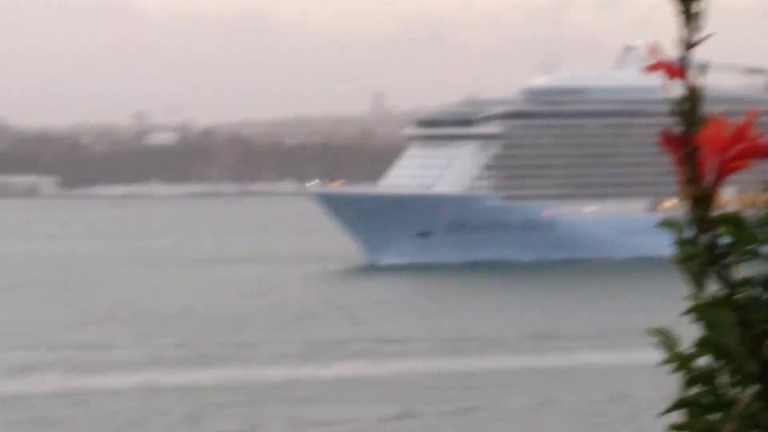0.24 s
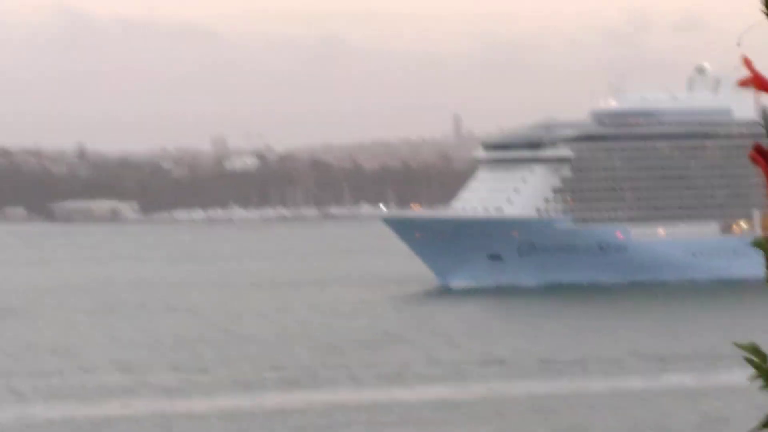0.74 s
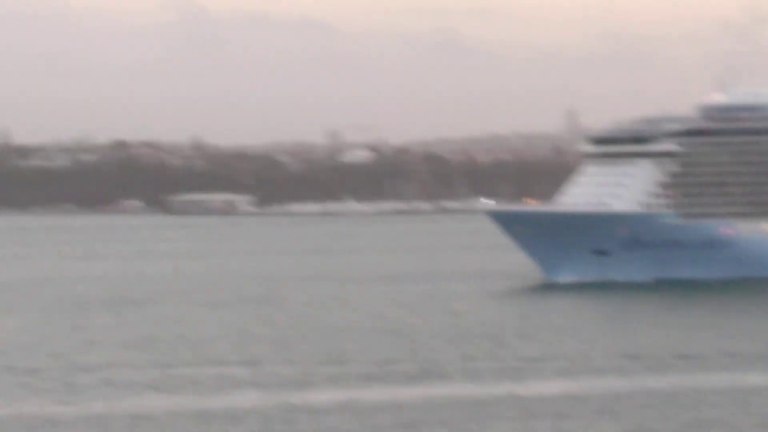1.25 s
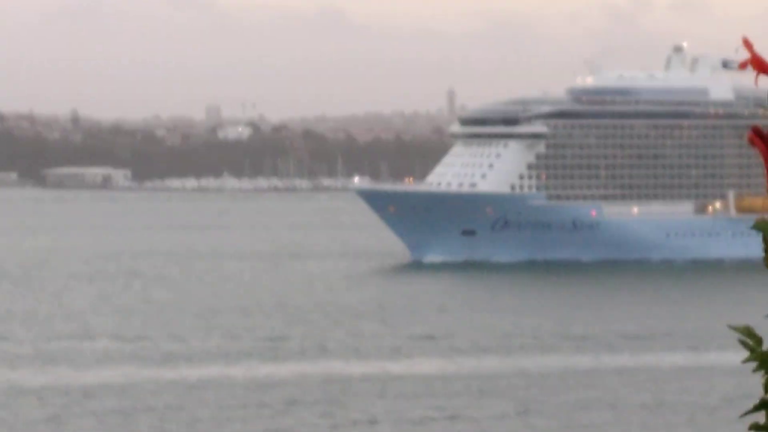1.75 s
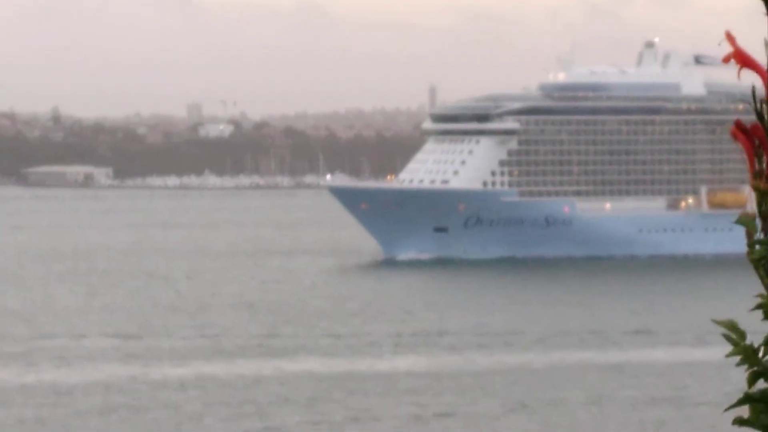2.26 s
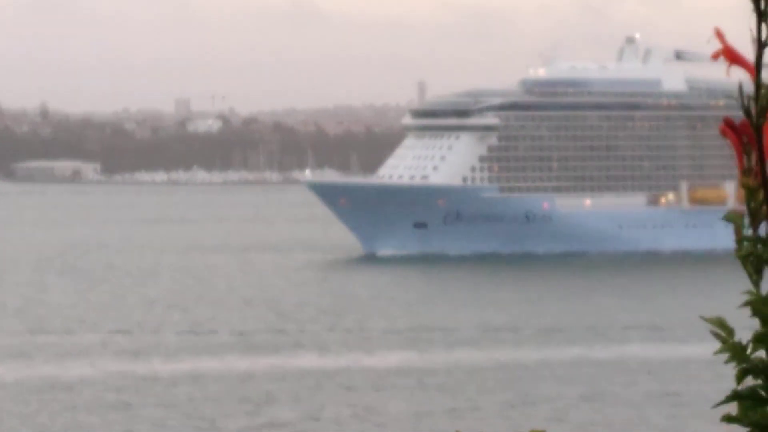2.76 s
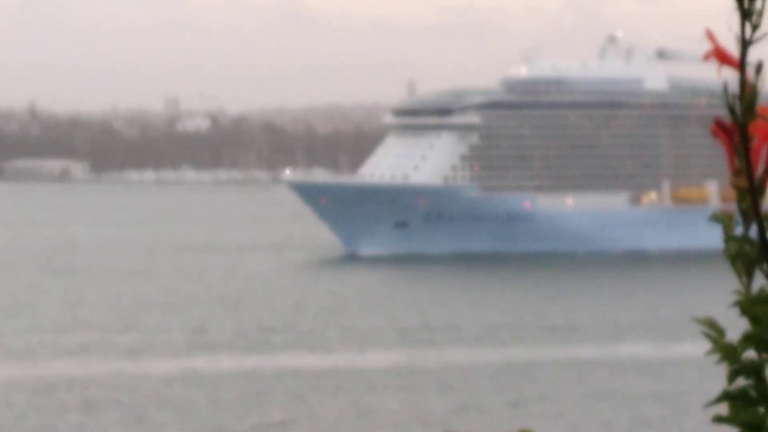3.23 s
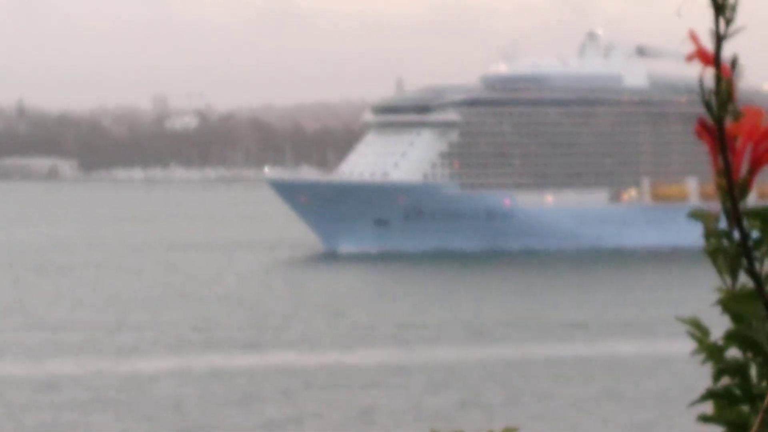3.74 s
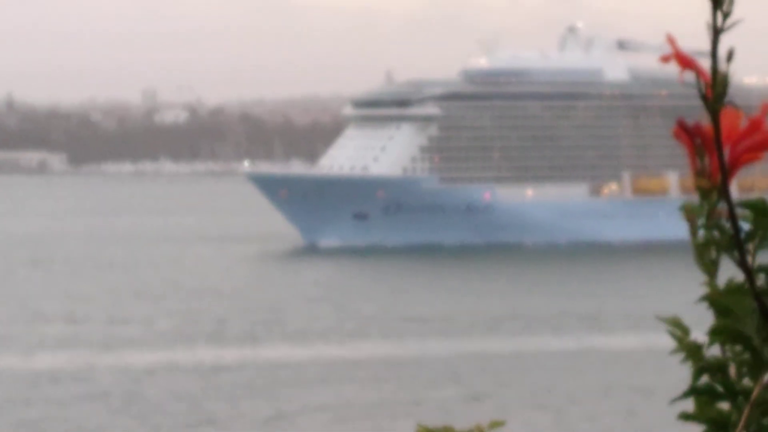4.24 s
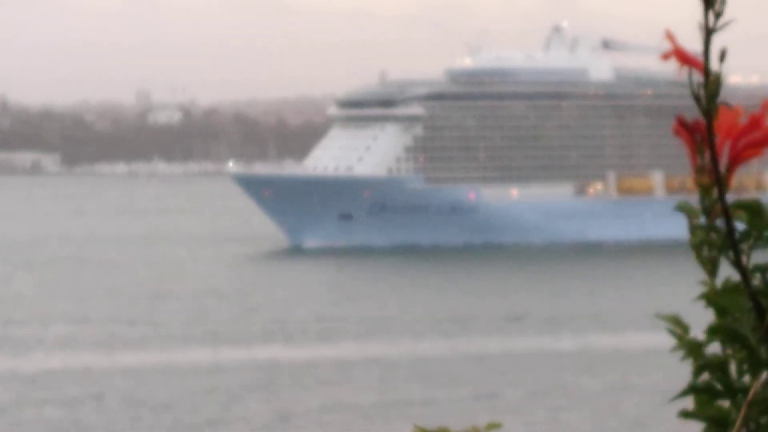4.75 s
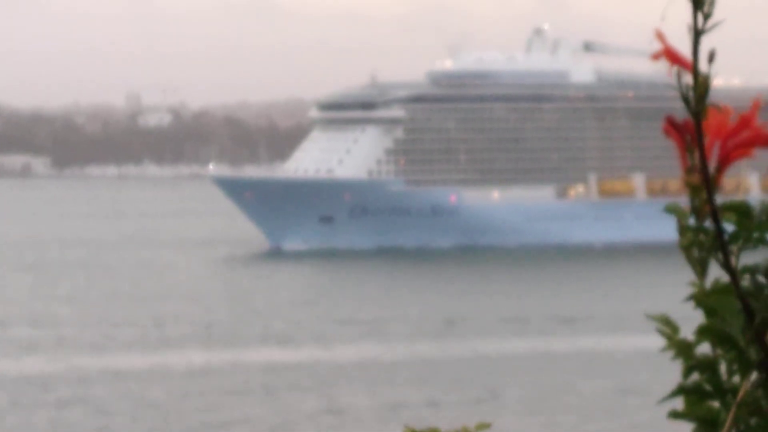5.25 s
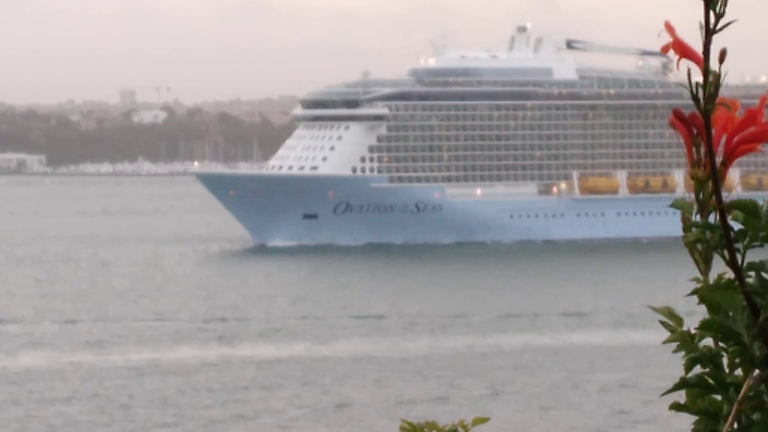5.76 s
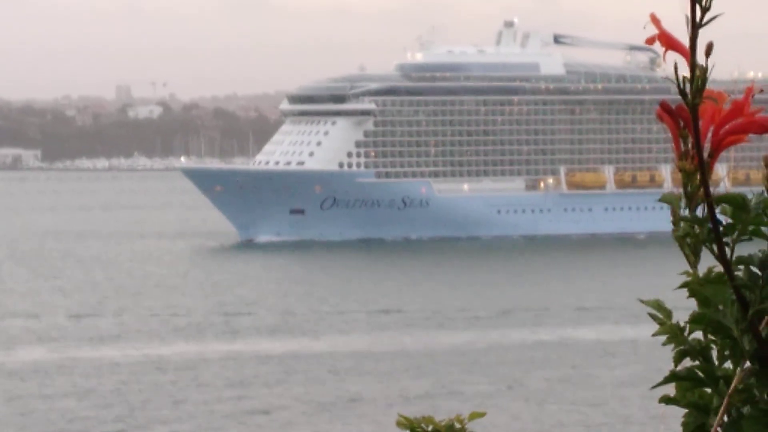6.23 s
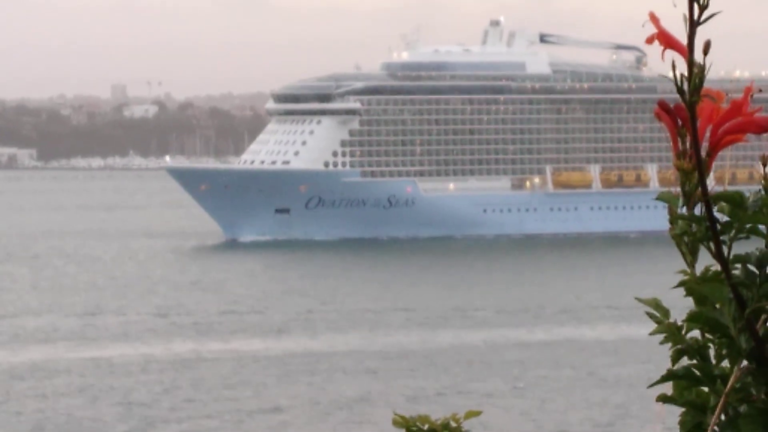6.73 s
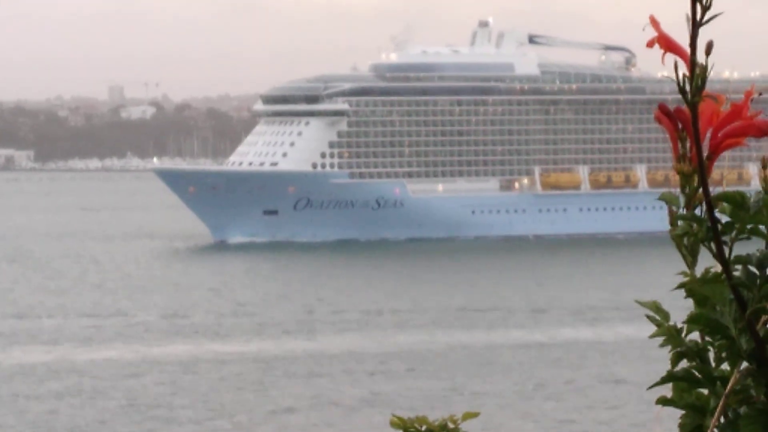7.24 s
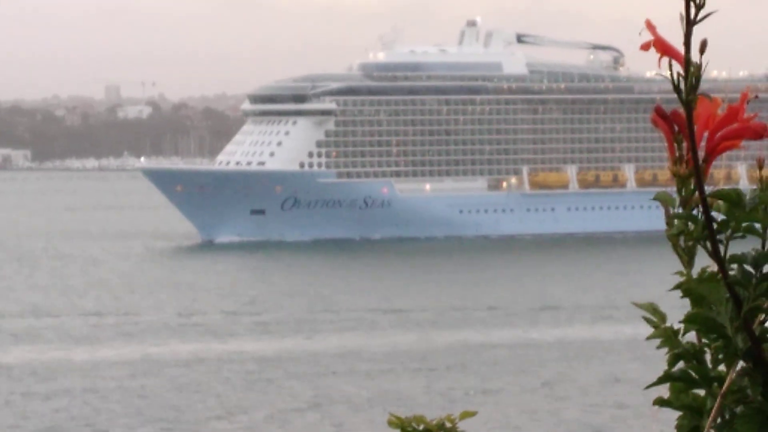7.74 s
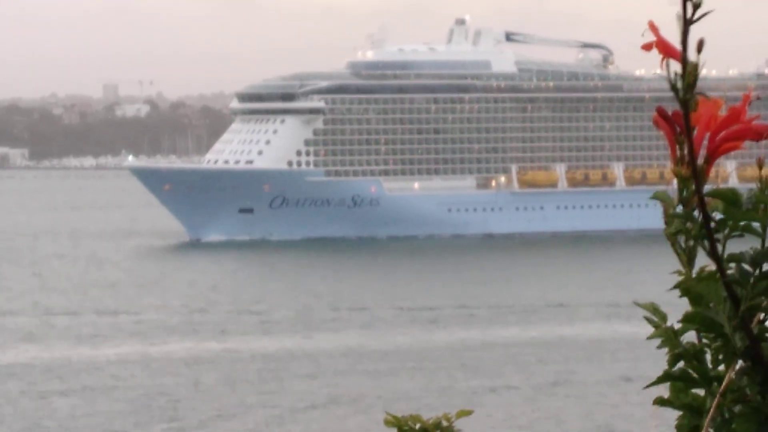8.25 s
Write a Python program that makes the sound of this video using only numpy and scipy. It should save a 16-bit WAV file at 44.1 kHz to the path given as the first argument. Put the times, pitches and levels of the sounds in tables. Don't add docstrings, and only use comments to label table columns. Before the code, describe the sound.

A large ship's deep, pulsing engine drone runs throughout over a dull wash of harbour water and distant city. Wind thuds and rumbles on the microphone, strongest on the right early on. Small twig ticks, a short faint hoarse bird call, soft wavelet slaps and far traffic moans pass by. Thin high chirps gather later, before a ringing tick close to the end. Handheld outdoor stereo sound, treble muffled by noise reduction.

```python
import sys
import numpy as np
from scipy import signal
from scipy.io import wavfile
from scipy.ndimage import uniform_filter1d

SR = 44100
rng = np.random.default_rng(int(sys.argv[2]) if len(sys.argv) > 2 else 0)


def log_audio(samples):
    frames = np.atleast_2d(samples).T
    limited = np.clip(frames, -1, 1)
    pcm = np.round(limited * 32767).astype(np.int16)
    wavfile.write(sys.argv[1], SR, pcm)


def field_ratio(decibels):
    return 10 ** (np.asarray(decibels, dtype=float) / 20)


N = 374409
LEFT_LAG_SAMPLES = 3

# (time [s], level [dB])
ROAR_SWELL = [(0.0, -1.5), (.14, -3), (.5, -3), (1.4, -4.5), (2.1, -2.5), (2.35, 1.5), (2.6, -1.5),
              (3.6, -2), (3.9, 0.5), (4.2, -3.5), (5.2, -2.5), (5.85, -1), (6.25, 2.5), (6.7, -0.5),
              (7.45, -3), (7.75, -1.5), (8.2, -0.5), (8.49, -2)]
# (frequency [Hz], density [dB per Hz])
ROAR_SPECTRUM = [(40, -59.5), (120, -69), (200, -68.5), (270, -74), (370, -71.5), (530, -77), (730, -78),
                 (1100, -83.5), (1600, -92), (2400, -96), (3500, -102), (5200, -111), (8500, -118),
                 (12500, -120)]
# (frequency [Hz], likeness [0..1])
ROAR_LIKENESS = [(60, 0.96), (300, 0.97), (530, 0.85), (1000, 0.43), (1500, 0.2), (2230, 0.77),
                 (4600, 0.044)]
# (time [s], length [s], centre [Hz], lift [dB])
SHORE_WASHES = [(.12, .08, 357, 6), (0.141, 0.21, 946, 4.5), (.23, 0.085, 605, 1.5), (.92, .2, 836, 4),
                (1.53, 0.11, 1900, 5.5), (1.938, .2, 705, 2.5), (2.303, 0.076, 914, 5.5),
                (2.37, 0.066, 400, 2.5), (2.507, 0.031, 855, 6), (2.742, 0.3, 306, 8),
                (2.706, .3, 217, 6.5), (2.8, 0.31, 447, 2.5), (6.398, 0.098, 905, 4), (6.25, 0.4, 1725, 2),
                (6.2, .35, 2200, 1.5), (0.203, 0.044, 805, 4), (5.5, .05, 435, 5), (8.15, 0.22, 432, 1),
                (0.899, 0.33, 2300, 3), (2.681, 0.069, 707, 7.5), (2.945, .07, 727, 2.5),
                (3.19, 0.13, 707, 4.5), (3.87, .1, 620, 8), (4.306, 0.12, 675, 5), (4.685, 0.17, 938, 6),
                (4.7, 0.19, 344, 5), (5.3, .08, 707, 5), (5.613, 0.13, 627, 5.5), (5.895, 0.11, 1030, 4),
                (6.104, .1, 670, 7), (6.37, 0.054, 910, 3.5), (6.59, 0.097, 471, 5), (6.79, 0.2, 360, 5.5),
                (6.856, 0.053, 587, 1), (7.052, 0.084, 750, -1.5), (7.696, .05, 456, -1),
                (8.165, 0.16, 830, 6), (8.421, 0.065, 353, 3)]
# (time [s], length [s], from [Hz], to [Hz], level [dB])
TRAFFIC_MOANS = [
    (2.311, 0.12, 410, 388, -47),
    (2.415, 0.12, 350, 327, -51.5),
    (2.9, 0.096, 740, 702, -56.5),
    (3.086, 0.17, 720, 691, -53),
    (6.047, 0.13, 745, 728, -59),
    (6.33, 0.099, 850, 844, -52.5),
    (6.414, 0.3, 445, 438, -51.5),
    (6.685, 0.42, 370, 309.6, -50.5),
    (6.781, .11, 585, 566, -53.5),
    (6.951, 0.187, 735, 688, -55.5),
]
# (time [s], peak [dB], pitch [Hz])
WAVELET_SLAPS = [(0.34, -40, 738), (0.765, -43, 554), (1.178, -44, 560), (2.383, -37, 670),
                 (2.608, -42, 557), (2.713, -39, 657), (3.235, -40, 692), (3.853, -37, 686),
                 (3.914, -39, 528), (4.093, -43, 853), (4.185, -42, 783), (4.21, -41, 452),
                 (5.252, -42, 676), (5.333, -39, 689), (6.234, -37, 633), (7.174, -40, 600),
                 (7.891, -42, 659), (8.008, -43, 735), (8.081, -38, 684), (8.142, -37, 746),
                 (8.249, -38, 452), (8.411, -44, 651)]
# (time [s], level [dB])
WIND_LULL = [(0.0, -37), (1.0, -37), (2.0, -28.5), (3.0, -38.5), (4.3, -32.5), (5.2, -41), (6.3, -42.5),
             (7.2, -33.5), (8.49, -41)]
# (time [s], peak [dB], length [s])
GUSTS_LEFT = [(0.0, -25, .1), (0.327, -39, .15), (.66, -33, .1), (1.0, -31, 0.1), (1.26, -32, 0.38),
              (1.783, -39, .13), (2.307, -34, 0.11), (2.75, -25, 0.11), (3.08, -34, 0.12),
              (3.45, -29, 0.12), (3.632, -28.5, 0.18), (3.963, -23, 0.13), (4.25, -37, .2),
              (4.678, -27.5, 0.27), (4.95, -35, 0.18), (5.42, -40.5, 0.24), (6.05, -35, 0.12),
              (6.565, -23, 0.11), (6.899, -29, 0.19), (7.345, -39, 0.16), (7.621, -24, 0.12),
              (7.802, -34, 0.16), (8.136, -26, 0.24), (8.438, -30, 0.18)]
GUSTS_RIGHT = [(0.0, -25, 0.75), (0.334, -27, 0.13), (0.555, -36, 0.16), (1.038, -26, 0.089),
               (1.17, -22, 0.058), (1.302, -17.5, 0.14), (1.688, -22, 0.13), (1.801, -22, 0.17),
               (2.18, -22, 0.059), (2.484, -28, 0.22), (2.75, -27.5, 0.11), (3.19, -39, 0.075),
               (3.449, -16.5, 0.037), (3.558, -20, 0.14), (3.738, -21.5, 0.12), (3.993, -20, 0.067),
               (4.089, -25, 0.12), (4.319, -29, 0.4), (4.522, -25.5, .1), (4.696, -23, 0.17),
               (4.946, -27, 0.14), (6.317, -29.5, .16), (6.593, -40, 0.13), (6.9, -33, 0.081),
               (7.074, -29.5, 0.56), (7.361, -24.5, 0.064), (7.588, -37, 0.1), (7.921, -30, 0.12),
               (8.238, -26, 0.16)]
# (time [s], peak [dB], width [s])
BUFFETS_LEFT = [(2.526, -22, 0.0068), (2.745, -17, 0.011), (3.662, -22.5, 0.0066), (3.891, -21, 0.0062),
                (3.925, -26.5, 0.005), (4.073, -18, 0.0049), (4.266, -21, 0.0073), (4.719, -29, 0.0093),
                (6.554, -30, 0.011), (6.883, -16.5, 0.012), (6.961, -23, 0.0074), (7.355, -16, 0.011),
                (7.733, -18, 0.009), (8.414, -21, 0.0079), (8.447, -17.5, 0.01)]
BUFFETS_RIGHT = [(0.044, -14, 0.008), (1.162, -13, 0.0088), (1.254, -28, 0.0037), (1.299, -13.5, 0.0053),
                 (1.342, -14.5, 0.0061), (1.413, -19, 0.012), (1.497, -20, 0.01), (1.69, -15, 0.0084),
                 (1.766, -29, 0.0029), (1.797, -12.5, 0.0077), (1.933, -23, 0.00487351),
                 (1.968, -17, 0.0081), (2.024, -24.5, 0.0069), (2.18, -14.5, 0.0066),
                 (2.286, -20.5, 0.0085), (3.457, -20, 0.005), (3.511, -23, 0.0064), (3.571, -12.5, 0.008),
                 (3.607, -26.5, 0.0087), (3.765, -19, 0.0067), (4.001, -15, 0.0075), (4.185, -21, 0.0067),
                 (4.322, -19, 0.0034), (4.521, -24, 0.0027), (4.553, -24, 0.00454715), (4.597, -20, 0.019),
                 (4.642, -25.5, 0.0066), (7.142, -29.5, 0.0053), (8.273, -18.5, 0.0093)]
# (time [s], length [s], from [Hz], to [Hz], level [dB])
BIRD_NOTES = [(5.275, 0.063, 7230, 7700, -79.5), (5.809, 0.028, 7100, 7500, -77),
              (5.85, 0.033, 7700, 7300, -78), (5.97, .03, 7700, 8000, -79), (6.003, .04, 7940, 7750, -77),
              (6.018, 0.018, 7360, 7420, -69), (6.034, 0.025, 7350, 7100, -77),
              (6.057, .035, 7250, 7300, -75), (6.086, 0.046, 7400, 7600, -70),
              (6.13, 0.036, 7400, 7700, -78), (6.29, .06, 7000, 7200, -81),
              (6.336, 0.067, 7280, 7420, -68.5), (6.828, 0.05, 6640, 7300, -84),
              (6.865, 0.042, 7270, 7330, -71), (6.884, 0.058, 7360, 7730, -74),
              (7.1, 0.05, 7100, 7300, -72), (7.126, 0.058, 7570, 7500, -64.5),
              (7.3, 0.085, 6620, 6770, -87.5), (6.898, 0.04, 3720, 3550, -78),
              (6.959, 0.037, 3390, 3590, -70),
              (0.858, 0.044, 9050, 9050, -86), (.99, 0.018, 8500, 8460, -88), (1.96, .02, 8700, 8500, -79),
             (2.047, .025, 8000, 7600, -72), (2.91, .08, 8650, 8750, -81.5), (7.48, .05, 5900, 5750, -81),
             (7.56, 0.044, 6070, 5950, -93), (.9, .09, 8460, 8450, -86), (4.175, .035, 8150, 7900, -84),
             (3.935, .018, 8800, 8550, -75), (3.95, .045, 8600, 8600, -85), (3.99, .035, 8750, 8850, -79),
             (4.025, .045, 8720, 8600, -82.5), (4.07, .045, 8600, 8750, -84), (4.11, .035, 8750, 8580, -83),
             (4.24, .03, 8550, 8600, -86), (4.33, .035, 8750, 8620, -84), (5.538, .04, 7200, 7600, -79)]
# (time [s], pitch [Hz], level [dB], left minus right [dB])
HOARSE_CALL = [
    (1.365, 4250, -83, -1),
    (1.39, 4400, -75.5, 6),
    (1.45, 4550, -71.5, 9),
    (1.52, 4400, -76, 8),
    (1.56, 4670, -72, 8),
    (1.6, 4850, -78, 15),
    (1.628, 4940, -77, 6),
    (1.634, 5100, -101, -4),
]
# (time [s], peak [dB], left minus right [dB], brightness [Hz], ring share [dB])
TWIG_TICKS = [
    (.597, -53, 0, 6380, -70),
    (1.6144, -61, 11, 6800, -70),
    (1.7383, -42.5, 19.5, 1700, -70.5),
    (1.7385, -52.5, 11, 4800, -70),
    (1.759, -55, 5.5, 2500, -66.5),
    (2.7408, -46.5, -2, 8500, -70),
    (8.0349, -32.5, 6.5, 6600, 8),
]
# (frequency [Hz], level [dB], t60 [s], left minus right [dB])
RING_MODES = [(2920, -28, .06, 0.0), (3550, -3.5, 0.019, -16.5), (4230, 3.5, 0.015, 2),
              (4850, -6, .008, 0.0), (4445, -20, 0.04, 2), (5320, -19, 0.03, -14), (6310, -4, 0.032, 10),
              (6185, -11, .025, 10), (6545, -20, 0.065, 9), (6930, -17.5, .051, 10), (7960, -30, .06, -3),
              (8962, -20.5, 0.04, -23), (9500, -6, .01, -14), (9905, -28, 0.07, -17)]
# (time [s], firing tone [dB], air path clearness [dB], shaft throb [dB])
SHIP_LEVELS = [(0.0, -32.5, -7, -38), (.5, -31.5, 1, -28.5), (1.0, -35.5, 7.5, -31.5), (1.5, -34, -2, -28),
               (2.0, -31.5, 9.5, -28.5), (2.5, -31.5, -5, -34.5), (3.0, -34.5, 10, -29),
               (3.5, -34.5, 9, -39), (4.0, -32.5, -5, -33), (4.5, -33, 6, -33.5), (5.2, -32, -15, -36),
               (6.0, -34, 9.5, -36), (6.5, -34, -5.5, -35), (7.0, -37.5, -15, -30), (7.5, -38.5, 0, -30.5),
               (8.0, -34.5, 7, -29.5), (8.49, -35, 9.5, -31.5)]
# (start [s], held [s], opening [dB])
FILTER_OPENINGS = [(1.355, .276, 6), (2.249, 0.11, -3.5), (2.414, 0.046, -7), (2.468, 0.043, -6),
                   (2.737, 0.025, -6), (3.038, .024, -5.5), (3.132, 0.024, -4.5), (3.411, 0.039, 8),
                   (3.868, 0.03, -5), (4.248, 0.026, -2), (5.059, 0.021, -10), (5.308, 0.036, -2),
                   (5.793, 0.027, -3), (5.845, 0.04, -5), (5.895, .622, 2), (6.569, 0.07, -5),
                   (6.826, .029, -4), (6.876, .066, 9), (6.953, .056, -2), (7.128, 0.054, -1),
                   (7.331, 0.081, 19), (7.558, 0.038, -1), (7.94, 0.045, -1), (8.025, 0.074, -1),
                   (8.098, 0.083, -2), (8.178, 0.06, -3)]
# (start [s], opening [dB])
FILTER_BLINKS = [(.075, -14), (0.126, -7), (.64, -10.5), (.993, -8.5), (1.055, -8.5), (1.119, -4),
                 (1.217, -5), (1.33, -6), (1.734, 14), (1.747, -7), (1.913, -6.5), (1.959, -9), (2.154, -5),
                 (2.182, -3), (2.22, -10), (2.55, -11.5), (2.711, -7), (3.764, -11.5), (3.797, -7),
                 (3.932, -12.5), (4.0, -18), (4.59, -11), (4.652, -6), (4.9, -8.5), (5.279, -5),
                 (5.739, -10), (6.553, -6.5), (7.108, -8), (7.251, -6), (7.308, -8), (7.629, -8.5),
                 (8.251, -6)]


def rms_one(x):
    return x / np.sqrt(np.mean(x ** 2, axis=-1, keepdims=True) + 1e-20)


def in_time(rows):
    time_s, *columns = np.transpose(rows)
    return [np.interp(np.arange(N) / SR, time_s, c) for c in columns]


def at_hz(points, hz):
    points_hz, values = np.transpose(points)
    return np.interp(np.log(hz), np.log(points_hz), values)


def drift(rate_hz):
    r = np.exp(-80 * np.pi * rate_hz / SR)
    slow = signal.lfilter([1], [1, -2 * r, r * r], rng.standard_normal(N // 40 + 2002))[2000:]
    return np.interp(np.arange(N) / 40, np.arange(len(slow)), rms_one(slow))


def cut(x, hz, kind, order=2):
    return signal.sosfilt(signal.butter(order, hz, kind, fs=SR, output="sos"), x)


def noise_band(low_hz, high_hz, order=2, shape=N):
    return rms_one(cut(rng.standard_normal(shape), [low_hz, high_hz], "band", order))


def panned(x, pan_db, lag=0.0):
    late = np.interp(np.arange(len(x)) - lag, np.arange(len(x)), x)
    return np.array([late * field_ratio(pan_db / 2), x * field_ratio(-pan_db / 2)])


def tone(hz, level_db):
    phase = 2 * np.pi * np.cumsum(hz) / SR + 2 * np.pi * rng.random()
    return np.sqrt(2) * field_ratio(level_db) * np.sin(phase)


def washes(hz):
    time_s, length_s, centre_hz, lift_db = np.transpose(SHORE_WASHES)[:, :, None]
    t = np.arange(0, N + 400, 200) / SR
    octaves = np.log2(hz / centre_hz)
    bells_db = lift_db * np.exp(-((t - time_s) / length_s) ** 2 - (octaves / 0.33) ** 2)
    return np.interp(np.arange(N) / SR, t, bells_db.sum(axis=0))


def roar(firing):
    swell_db, = in_time(ROAR_SWELL)
    edges_hz = 40 * 2 ** (np.arange(27) / 3)
    white = rng.standard_normal((2, 2, N))
    puff = np.cos(firing - 3.3)
    out = 0
    for k, (low_hz, high_hz) in enumerate(zip(edges_hz, edges_hz[1:])):
        hz = np.sqrt(low_hz * high_hz)
        mid, side = cut(white[k % 2], [low_hz, high_hz], "band") * np.sqrt(SR / 2)
        alike = np.clip(at_hz(ROAR_LIKENESS, hz), 0, 1)
        flicker_db = 0.5 * drift(0.36) + 1.7 * drift(4.4)
        gain = field_ratio(at_hz(ROAR_SPECTRUM, hz) + swell_db + washes(hz) + flicker_db)
        gain = gain * (1 + 0.33 * min(1, 1300 / hz) * puff)
        stereo = np.sqrt(1 + alike) * mid + np.sqrt(1 - alike) * side * [[1], [-1]]
        out = out + gain * stereo / np.sqrt(2)
    out[0, LEFT_LAG_SAMPLES:] = out[0, :-LEFT_LAG_SAMPLES].copy()
    return out * field_ratio(1.1 * drift(33.0))


def moans():
    width_hz = 22
    out, rough = np.zeros(N), (drift(width_hz), drift(width_hz))
    for time_s, length_s, from_hz, to_hz, db in TRAFFIC_MOANS:
        a, b = round(time_s * SR), round((time_s + length_s) * SR)
        phase = 2 * np.pi * np.cumsum(np.linspace(from_hz, to_hz, b - a)) / SR
        voice = (1 + rough[0][a:b]) * np.sin(phase) + rough[1][a:b] * np.cos(phase)
        out[a:b] += field_ratio(db) * signal.windows.tukey(b - a, 0.6) * voice
    return panned(out, 0.3, lag=LEFT_LAG_SAMPLES)


def slaps():
    t60_s, trim_db, rise_share = 0.03, -2.5, 0.1
    out, t = np.zeros(N + 4410), np.arange(4410) / SR
    for time_s, db, hz in WAVELET_SLAPS:
        ringing = np.sin(2 * np.pi * hz * t * (1 + rise_share * t / t60_s))
        plop = ringing * field_ratio(db + trim_db - 60 * t / t60_s)
        start = round(time_s * SR)
        out[start:start + len(t)] += plop * np.minimum(t / 0.0013, 1)
    return panned(out[:N], 0.5, lag=LEFT_LAG_SAMPLES)


def gusts(rows):
    time_s, peak_db, length_s = np.transpose(rows)[:, :, None]
    t = np.arange(0, N + 400, 200) / SR
    fall_db = 13 * np.abs(t - time_s) / length_s
    peaks_db = (peak_db - fall_db).max(axis=0)
    return np.maximum(np.interp(np.arange(N) / SR, t, peaks_db), in_time(WIND_LULL)[0])


def buffets(rows):
    narrowing, trim_db = 0.49, -2
    out, t = np.zeros(N + 4000), np.arange(-2000, 2000) / SR
    for (time_s, db, width_s), sign in zip(rows, rng.choice([-1, 1], len(rows))):
        u = t / (width_s * narrowing)
        start = round(time_s * SR)
        out[start:start + len(t)] += sign * field_ratio(db + trim_db) * u * np.exp(0.5 - u ** 2 / 2)
    return out[2000:N + 2000]


def evened_noise(low_hz, high_hz, order):
    x = cut(cut(rng.standard_normal(N), high_hz, "low", order), low_hz, "high")
    return rms_one(x / np.sqrt(uniform_filter1d(x ** 2, size=3500) + 0.22 * np.mean(x ** 2)))


def wind():
    out = []
    for gust_rows, buffet_rows in (GUSTS_LEFT, BUFFETS_LEFT), (GUSTS_RIGHT, BUFFETS_RIGHT):
        lumps_db = gusts(gust_rows) + 2.0 * drift(6.2)
        thud_db = np.minimum(-45.5 + 1.8 * (lumps_db + 24.5), -24)
        rumble = field_ratio(lumps_db - 3.5) * evened_noise(19, 50, order=3)
        sway = field_ratio(lumps_db - 2.5) * evened_noise(4, 19, order=3)
        thud = field_ratio(thud_db) * evened_noise(50, 130, order=2)
        out.append(rumble + sway + thud + buffets(buffet_rows))
    return np.array(out)


def birds():
    glide_share, swell_db = 0.72, 4
    out = np.zeros((2, N))
    unsteady, flutter_db = 1 + 0.0026 * drift(60), 1.8 * drift(50)
    for time_s, length_s, from_hz, to_hz, db in BIRD_NOTES:
        a, b = round(time_s * SR), round((time_s + length_s) * SR)
        done = np.minimum(np.linspace(0, 1, b - a) / glide_share, 1)
        hz = from_hz + (to_hz - from_hz) * np.sin(np.pi / 2 * done) ** 2
        below_top = 1 - done if to_hz > from_hz else done
        note = tone(hz * unsteady[a:b], db - swell_db * below_top + flutter_db[a:b])
        out[:, a:b] += panned(signal.windows.tukey(b - a, 0.35) * note, 5.3, lag=-0.58)
    return out


def hoarse_call():
    hz, db, pan_db = in_time(HOARSE_CALL)
    phase = 2 * np.pi * np.cumsum(hz) / SR
    rough = rms_one(cut(rng.standard_normal((4, N)), 220, "low"))
    airy = noise_band(1300, 6000)
    voice = rough[0] * np.sin(phase) + rough[1] * np.cos(phase)
    octave = rough[2] * np.sin(2 * phase) + rough[3] * np.cos(2 * phase)
    on = np.where(db > -91, 1, 0)
    return panned(field_ratio(db) * on * (voice + field_ratio(-18.0) * octave + field_ratio(-5.0) * airy), pan_db)


def ticks():
    out, t = np.zeros((2, N + 8820)), np.arange(8820) / SR
    for time_s, db, pan_db, hz, ring_db in TWIG_TICKS:
        crack = noise_band(hz / 2, min(hz * 1.3, 11000), 3, len(t)) * field_ratio(-60 * t / 0.012)
        snap = rms_one(cut(rng.standard_normal(len(t)), 2500, "high")) * field_ratio(-7 - 60 * t / 0.004)
        ring = 0
        for mode_hz, mode_db, t60_s, side_db in RING_MODES:
            mode = field_ratio(mode_db - 60 * t / t60_s) * np.sin(2 * np.pi * mode_hz * t)
            ring = ring + panned(mode, side_db)
        scatter = noise_band(2800, 9800, shape=(2, len(t))) * field_ratio(-23 - 60 * t / 0.11)
        hit = 0.5 * panned(crack + snap, pan_db)
        hit = hit + field_ratio(ring_db) * (ring + scatter + panned(snap, -pan_db))
        hit = hit * np.minimum(t / 0.0005, 1)
        hit = cut(hit, 0.43 * hz, "high", order=6)
        start = round(time_s * SR)
        out[:, start:start + len(t)] += field_ratio(db) * hit
    return out[:, :N]


def funnel():
    centre_hz, width_hz, level_db = 694.6, 90, -61.5
    band = noise_band(centre_hz - width_hz / 2, centre_hz + width_hz / 2)
    gain = field_ratio(level_db + 1.0 * washes(centre_hz) + 2.5 * drift(5.8))
    return panned(band * gain, 0.3, lag=LEFT_LAG_SAMPLES)


def ship():
    firing_hz, sag_hz_per_s = 84.99, 0.29
    abeam_s, abeam_takes_s = 2.9, 0.27
    shaft_per_firing, generator_hz, fan_hz = 0.345, 100.06, 122.2
    first_db, clear_db, shaft_db = in_time(SHIP_LEVELS)
    t = np.arange(N) / SR
    hz = (firing_hz - sag_hz_per_s * t) * (1 + 0.0015 * drift(1.5))
    firing = 2 * np.pi * np.cumsum(hz) / SR
    second_db = -51.5 + 4 * np.tanh((t - abeam_s) / abeam_takes_s) + 0.15 * clear_db
    third_db = -60.5 + clear_db
    fourth_db = -67.5 + 5.5 * drift(0.22)
    orders = 0
    for k, db in enumerate((first_db, second_db, third_db, fourth_db), start=1):
        gain = field_ratio(db + 0.7 * k * drift(9.0))
        orders = orders + gain * np.sin(k * firing + 0.17 * k * drift(6.0))
    for k in range(5, 9):
        orders = orders + field_ratio(-59.5 - 1.3 * k + 2.6 * drift(18.0)) * np.sin(k * firing)
    shaft_hz = shaft_per_firing * hz * (1 + 0.05 * drift(2.05))
    shaft = tone(shaft_hz, shaft_db - 3.0 + 2.5 * drift(2.1))
    generator_db = -45 + 0.3 * clear_db + 1.5 * drift(0.8) + 0.5 * drift(3.3)
    generator = tone(np.full(N, generator_hz), generator_db)
    fan = tone(fan_hz * (1 + 0.004 * drift(1.2)), -58 + 3.0 * drift(1.7))
    engine = np.sqrt(2) * orders + shaft
    return panned(engine, 0.43) + panned(generator + fan, -0.48, lag=-14), firing


def scene():
    drone, firing = ship()
    far = roar(firing) + moans() + slaps()
    near = (birds() + hoarse_call() + ticks()) * field_ratio(3.5)
    return far + wind() + near + funnel() + drone


def treble_share():
    blink_s, creep_share, longest_creep_s = 0.019, 0.75, 0.045
    db = -18.5 + 3.2 * drift(22.0)
    t = np.arange(N) / SR
    blinks = [(start_s, blink_s, open_db) for start_s, open_db in FILTER_BLINKS]
    for start_s, held_s, open_db in FILTER_OPENINGS + blinks:
        a, b = round(start_s * SR), round((start_s + held_s + 0.0049) * SR)
        creep_s = min(creep_share * held_s, longest_creep_s)
        corners_s = [0, creep_s, held_s, held_s + 0.0028]
        shape_db = np.interp(t[a:b] - start_s, corners_s, [-17, open_db, open_db, -22])
        db[a:b] = np.maximum(db[a:b], shape_db)
    return np.minimum(field_ratio(db), 1)


def noise_filter(full):
    shut_hz, duck_hz, duck_db = 2340, 1010, -6.5
    dull = signal.filtfilt(*signal.butter(3, shut_hz, fs=SR), full)
    low = signal.filtfilt(*signal.butter(1, duck_hz, fs=SR), dull)
    dull = low + field_ratio(duck_db) * (dull - low)
    return dull + treble_share() * (full - dull)


def roll_off(x):
    return signal.sosfilt(signal.butter(12, 15700, fs=SR, output="sos"), x)


def record(dry):
    leak = field_ratio(-18) * cut(dry, 10800, "high", order=4)
    heard = cut(dry, 9100, "low", order=6) + leak
    gated = noise_filter(heard)
    fade = np.sin(np.pi / 2 * np.minimum(np.arange(N)[::-1] / 300, 1)) ** 2
    hiss = field_ratio(-90) * rng.standard_normal(dry.shape)
    return roll_off(gated * fade + hiss)


dry = scene()
out = record(dry)
log_audio(out)
```